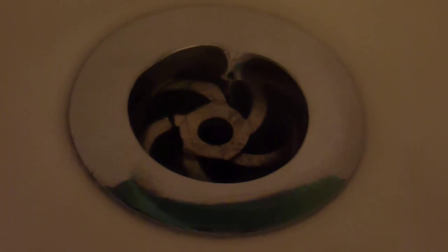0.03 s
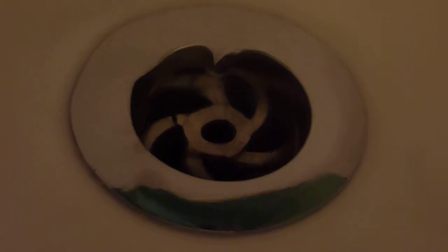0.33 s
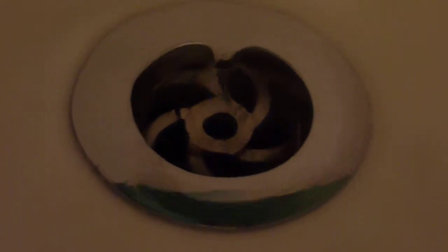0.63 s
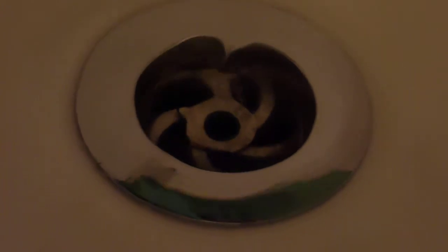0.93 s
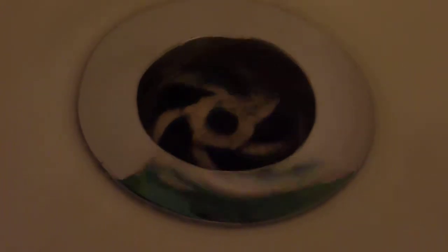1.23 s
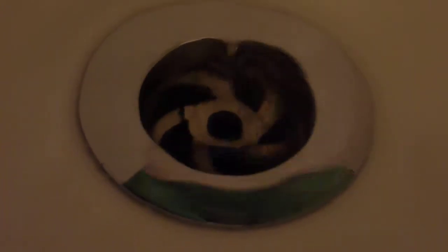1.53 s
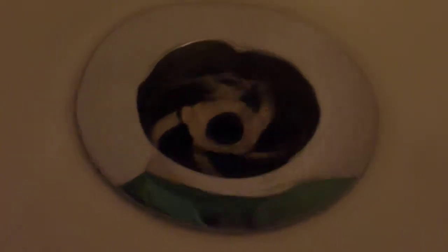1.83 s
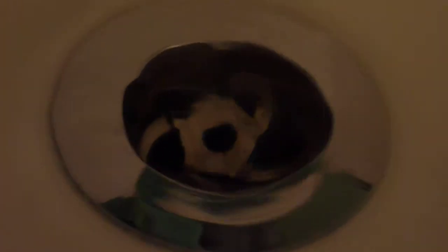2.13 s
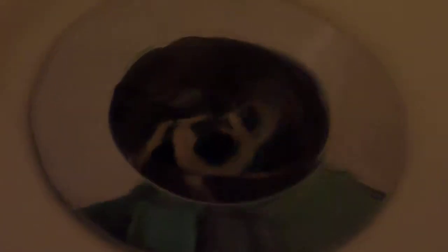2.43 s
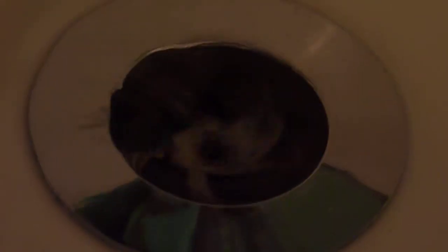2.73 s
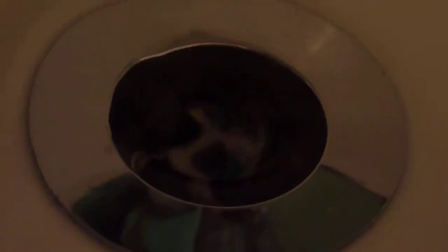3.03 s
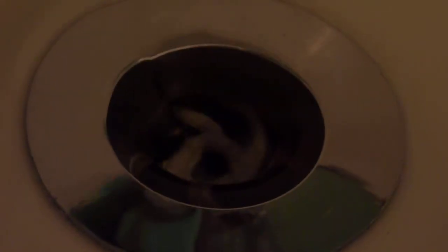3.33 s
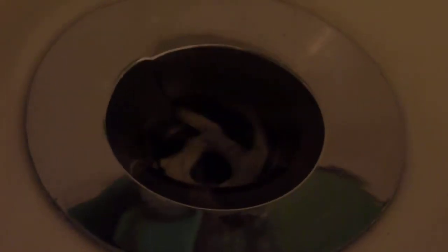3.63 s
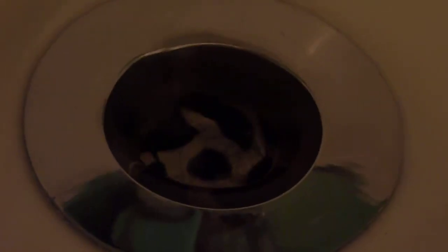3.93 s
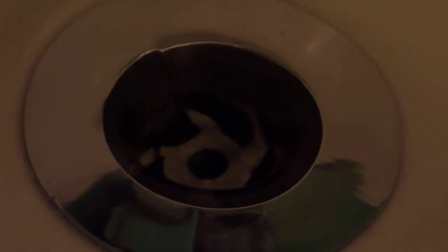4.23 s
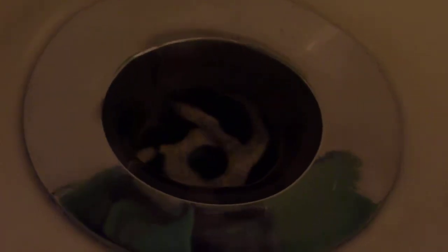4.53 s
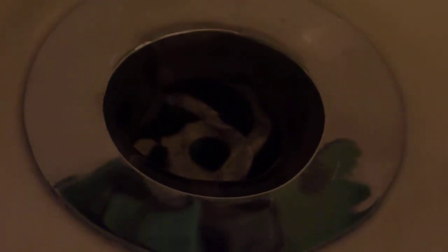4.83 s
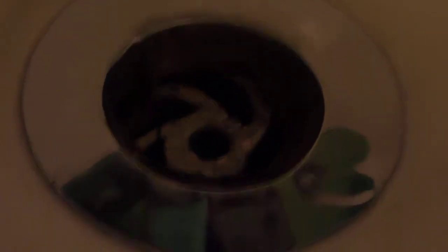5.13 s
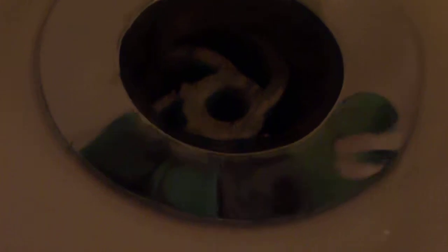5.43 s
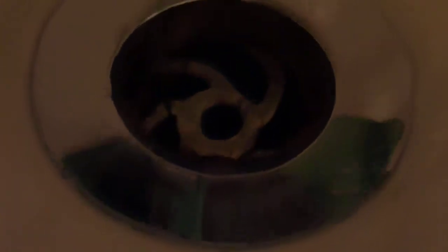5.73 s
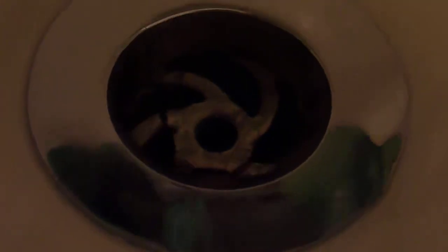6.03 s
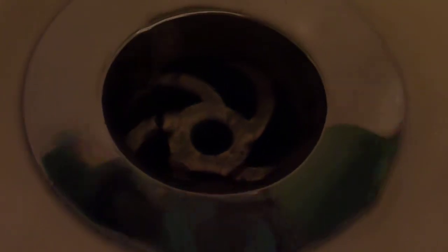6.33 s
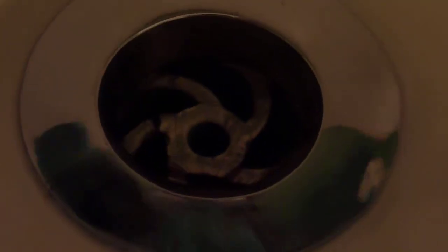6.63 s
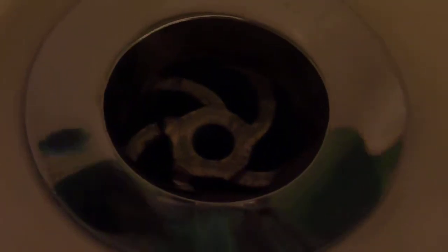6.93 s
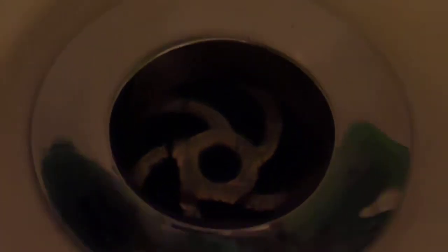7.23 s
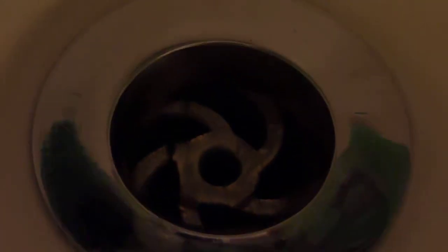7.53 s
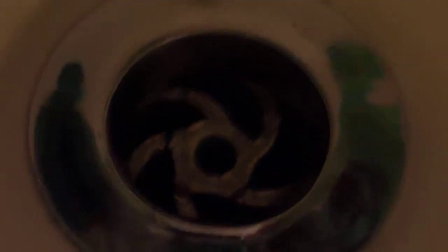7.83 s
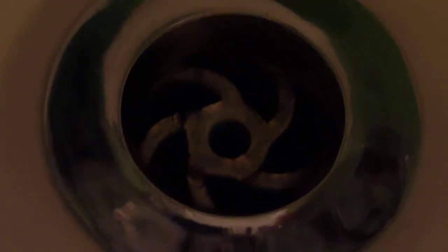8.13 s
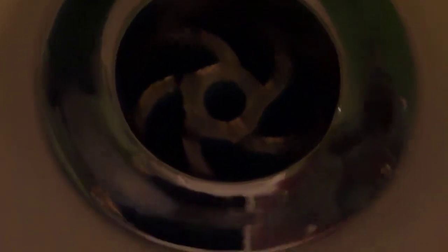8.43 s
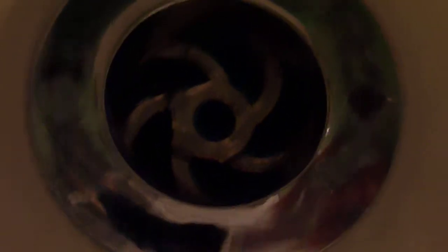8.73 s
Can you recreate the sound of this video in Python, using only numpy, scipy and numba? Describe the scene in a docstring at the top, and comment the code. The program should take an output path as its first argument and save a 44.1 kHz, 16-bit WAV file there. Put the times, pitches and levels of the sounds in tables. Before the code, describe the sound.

The last water gurgles down a sink drain close by, with big glugs and wet slurps fading into a soft trickle.

```python
"""A basin draining

The last water leaves a basin through its plughole, heard from close by in a small tiled room.
A swirling film spatters down the open waste pipe and excites its resonances. The throat chokes and
gulps air in big glugs, each a pocket of air ringing as it pinches off, and these end in wet slurps.
A thin trickle with small bursting bubbles runs on into the trap, whose hollow note rises as it fills."""
import sys
import numpy as np
from scipy import signal
from scipy.fft import rfft, irfft, next_fast_len
from scipy.io import wavfile
from numba import njit

SR = 44100
rng = np.random.default_rng(int(sys.argv[2]) if len(sys.argv) > 2 else 0)


def wav_out(sig):
    """Save sig, one row per channel (or a flat mono array), as 16-bit PCM at SR to the path in sys.argv[1]."""
    wavfile.write(sys.argv[1], SR, np.round(np.clip(np.atleast_2d(sig).T, -1, 1) * 32767).astype(np.int16))


N = 387638
TIME = np.arange(N) / SR
FFT_SIZE = next_fast_len(N + SR)
FREQ = np.maximum(np.arange(FFT_SIZE // 2 + 1) * SR / FFT_SIZE, 1)
# The film pours over the rim, the throat chokes, air slurps through, the basin is empty, the trap fills.
POUR_S, CHOKE_S, SLURP_S, EMPTY_S, FILL_S = 0.88, 3.315, 4.68, 5.28, 6.05

# Spectrum of the indoor background. Each row: frequency in Hz, relative level in dB.
ROOM_SPECTRUM = [(30, -31.5), (105, 1), (135, -9.5), (180, -2.5), (320, -7.5), (550, -12), (1200, -16.5),
                 (2200, -25), (6000, -29), (8000, -40.5)]
# Strength of the vortex. Each row: time in seconds, level in dB.
VORTEX_LEVEL = [(0.0, -53), (0.9, -53), (1.3, -42.5), (1.71, -45), (2.45, -30.5), (2.99, -35.5),
                (3.23, -31), (4.23, -24), (4.41, -33), (4.75, -23), (5.07, -26), (5.3, -37), (5.6, -43),
                (5.93, -39), (6.1, -55.5), (8.79, -55)]
# Resonance of the air pockets in the throat. Each row: time in seconds, pitch in Hz.
POCKET_PITCH = [(0.6, 206.5), (1.2, 323), (2.0, 300), (2.4, 175.2), (4.5, 350), (4.9, 239), (5.5, 378),
                (5.97, 335), (6.03, 183.4)]
# Low modes of basin and room. Each row: frequency in Hz, bandwidth in Hz, gain in dB.
LOW_MODES = [(72, 19, -3), (104.7, 8.4, 2.5), (142.3, 3.2, 3), (225.4, 1.7, -3), (337.4, 44, -5)]
# Gulps of air. Each row: start in seconds, level in dB, pitch in Hz, level of the splash in dB.
GULPS = [(0.059, -38, 512, -60), (1.45, -32.5, 324, -28.5), (1.859, -25.5, 317, -34),
         (2.044, -23, 310, -32), (2.323, -18, 155, -29.5), (2.414, -19.5, 345, -25),
         (2.678, -21.5, 147.5, -26.5), (3.062, -20.5, 317, -38), (3.106, -16, 254, -27),
         (3.25, -15.5, 200, -28), (3.315, -15.5, 202, -27), (3.391, -20, 342, -33), (3.461, -14, 302, -44),
         (3.52, -15, 462, -33.5), (3.625, -11.5, 371, -36), (3.673, -16.5, 185, -26.5),
         (3.74, -13.5, 186.6, -30), (3.782, -11.5, 343, -25.5), (3.806, -15.5, 297, -25),
         (3.89, -14.5, 410, -25.5), (3.95, -15.5, 416, -37), (3.973, -11, 344, -24.5),
         (3.99, -13.5, 361, -38), (4.015, -14.5, 395, -24), (4.071, -10, 383, -28), (4.088, -12, 309, -38),
         (4.126, -10, 421, -40), (4.137, -8, 315, -35.5), (4.163, -17, 347, -34.5), (4.189, -9, 328, -32.5),
         (4.26, -11.5, 281, -26.5), (4.298, -15, 382, -34), (4.322, -12.5, 318, -29),
         (4.347, -17, 330, -38), (4.398, -10, 338, -60), (4.443, -12.5, 308, -30), (4.551, -11.5, 334, -32),
         (4.596, -16.5, 392, -26), (4.659, -7, 415, -26.5), (4.692, -15.5, 342, -24),
         (4.725, -14.5, 427, -20), (4.75, -10.5, 369, -23), (4.806, -8.5, 233, -18.5),
         (4.913, -17, 212, -22), (4.993, -12, 201.3, -20), (5.023, -23.5, 202, -21.5),
         (5.086, -15.5, 390, -19.5), (5.148, -19, 386, -17.5), (5.219, -27, 366, -29),
         (5.519, -24.5, 371, -28)]
# Modes of the half-choked throat. Each row: frequency in Hz, bandwidth in Hz, relative gain in dB.
THROAT_MODES = [(426, 250, 39), (793.4, 260, 10), (1328, 320, -3), (2370, 430, -9.5)]
# Colouring of the froth deep in the pipe. Each row: frequency in Hz, relative gain in dB.
DEEP_FIZZ_COLOUR = [(2500, 5.5), (3200, -5), (4000, 2), (6000, -0.5)]
# Bubbles bursting at the grate. Each row: start in seconds, level in dB, pitch in Hz.
GRATE_BUBBLES = [(0.365, -39.5, 3100), (0.597, -34, 5240), (0.609, -30.5, 5640), (0.7275, -38, 6000),
                 (0.9298, -32.5, 6060), (1.0848, -27.5, 6170), (3.2963, -22, 6030), (3.4308, -31.5, 3370),
                 (3.6707, -19, 5270), (3.9269, -27.5, 3470), (3.9743, -21.5, 4290), (4.068, -25, 6650),
                 (4.136, -24, 3550), (4.3633, -33.5, 2600), (4.5823, -24, 6110), (4.6219, -26.5, 3070),
                 (4.665, -29.5, 2550), (4.97, -33, 2560), (4.995, -29, 2560), (5.0627, -27.5, 2490),
                 (5.162, -26.5, 2570), (5.2775, -27, 2600), (5.296, -25, 2470), (5.517, -30, 3080),
                 (6.0806, -31, 2830), (6.3453, -30.5, 2980), (6.66, -35.5, 3200), (8.2846, -33, 3940)]
# Gobs of water spattering down the pipe. Each row: start in seconds, level in dB.
GOBS = [(0.495, -43), (0.526, -41.5), (0.881, -38), (1.052, -37.5), (1.0767, -32), (1.119, -31.5),
        (1.1682, -32.5), (1.2162, -26.5), (1.2973, -33.5), (1.3759, -29), (1.4139, -30.5), (1.6044, -31.5),
        (1.6921, -27.5), (2.031, -28.5), (2.3246, -25.5), (2.4247, -30), (2.912, -35)]
# Modes of the open waste pipe. Each row: frequency in Hz, bandwidth in Hz, relative gain in dB.
PIPE_MODES = [(156, 8.8, 5.5), (599, 103, 14.5), (797, 61, 12.5), (1210, 165, 6), (1530, 94, 7),
              (1821, 63, 2), (2420, 71, 3), (2630, 77, -11.5), (3490, 150, -9), (4170, 110, -18),
              (5900, 900, -26)]
# Bubbles popping in the pipe. Each row: start in seconds, level in dB, pitch in Hz.
PIPE_BUBBLES = [(0.525, -38, 975), (2.677, -25, 1160), (3.141, -24.5, 1152), (3.3589, -24.5, 1230),
                (4.016, -25, 627), (4.693, -23, 842), (4.741, -17, 1474), (4.751, -19.5, 1180),
                (4.807, -31, 722), (4.914, -21.5, 832), (4.997, -18, 1288), (5.026, -21.5, 774),
                (5.085, -24, 1610), (5.151, -17.5, 810), (5.22, -24.5, 1510), (5.455, -25.5, 1330),
                (6.661, -34.5, 957)]
# Sharp wet smacks and ticks, from drops and the onsets of slurps.
# Each row: start in seconds, level in dB, pitch in Hz, spray level in dB.
WET_SMACKS = [(0.7839, -22.5, 2140, -34), (2.112, -28, 6000, -28), (2.358, -39, 3870, -35.5),
              (2.747, -30.5, 3500, -32), (4.999, -21, 1004, -56), (5.087, -15.5, 1920, -36.5),
              (5.347, -20.5, 3730, -55), (6.15, -20, 2850, -38), (6.2628, -46, 5000, -26),
              (7.446, -57, 4500, -42), (7.989, -39, 1700, -54)]
# Colouring of the froth at the grate. Each row: frequency in Hz, relative gain in dB.
GRATE_FIZZ_COLOUR = [(1000, 13.5), (2000, -1), (3600, 8), (4500, 1), (5200, 3), (6300, -0.5), (8500, 4.5)]
# Modes of the air column under the grate. Each row: frequency in Hz, bandwidth in Hz, gain in dB.
COLUMN_MODES = [(242, 8, -1), (810, 32, 4.5)]
# Strength of the trap's hollow note. Each row: time in seconds, level in dB.
TRAP_LEVEL = [(5.9, -54), (6.28, -46.5), (6.45, -56), (6.72, -44), (6.85, -54), (6.97, -51), (7.58, -61),
              (7.95, -56), (8.79, -60)]
# Balance of the two microphone ports. Each row: frequency in Hz, left minus right in dB.
PORT_LEVEL_GAP = [(250, 3), (600, 2), (1500, 2), (2800, -1), (6000, 0)]
# Phase between the ports. Each row: frequency in Hz, lead of the left in radians.
PORT_PHASE_LEAD = [(400, 0.089), (700, 0.8), (1300, 1.06), (3000, 1.71), (6000, 0.68)]


def undb(db):
    """Amplitude ratio of a level in decibels."""
    return 10 ** (np.asarray(db) / 20)


def unit(x):
    """Normalisation to an rms of 1."""
    return x / np.sqrt(np.mean(x ** 2))


def curve(rows, t):
    """Linear interpolation of (time, value) rows at times t."""
    return np.interp(t, *np.transpose(rows))


def across(points):
    """Interpolation of (frequency, value) rows on a logarithmic frequency axis."""
    hz, value = np.transpose(points)
    return np.interp(np.log(FREQ), np.log(hz), value)


def during(start_s, end_s, fade_s):
    """A gate: 1 while a stage lasts, fading linearly beyond its ends."""
    return np.clip(1 + np.minimum(TIME - start_s, end_s - TIME) / fade_s, 0, 1)


def since(s):
    """Seconds elapsed since a moment; 0 before it."""
    return np.maximum(TIME - s, 0)


def filtered(x, response):
    """Linear filtering: the spectrum is multiplied by a frequency response."""
    return irfft(rfft(x, FFT_SIZE) * response, FFT_SIZE)[..., :N]


def resonances(modes):
    """Superposition of the frequency responses of damped modes."""
    return sum(undb(db) / (1 + 1j * (FREQ ** 2 - hz ** 2) / (FREQ * width)) for hz, width, db in modes)


def unit_power(response):
    """Normalisation of a response so that white noise keeps its rms."""
    return response / np.sqrt(np.mean(np.abs(response) ** 2))


@njit
def ring_down(starts, hz, cycles, sizes, rise):
    """Damped oscillators: each swells over a cycle or two, then decays as its pitch rises."""
    out = np.zeros(N)
    for k in range(len(starts)):
        first, life, phase = int(starts[k] * SR), cycles[k] * SR / hz[k], 0.
        for i in range(min(int(6 * life), N - first)):
            phase += hz[k] / SR * (1 + rise * (1 - np.exp(-i / life / 2)))
            envelope = (1 - np.exp(-phase * phase / 2)) * np.exp(-i / life)
            out[first + i] += sizes[k] * envelope * np.sin(2 * np.pi * phase)
    return out


def bubbles(starts, hz, sizes, cycles, rise):
    """Bubble resonance: decay by 1/e in `cycles` periods, with pitch rising by the fraction `rise`."""
    return ring_down(starts, hz, np.full(len(starts), cycles, float), sizes, rise)


@njit
def cavity(x, hz, width_hz):
    """A band-pass resonance of constant bandwidth and moving centre."""
    y, band, low = np.empty(N), 0., 0.
    for i in range(N):
        tuning, damping = np.tan(np.pi * hz[i] / SR), width_hz / hz[i]
        velocity = (band + tuning * (x[i] - low)) / (1 + tuning * (tuning + damping))
        band, low = 2 * velocity - band, low + 2 * tuning * velocity
        y[i] = damping * velocity
    return y


def swarm(count, spread_db):
    """A random bubble population: start times, amplitudes, and spreads (-1 to 1) of pitch and ring."""
    slot, size, pitch, ring = rng.random((count, 4)).T
    size_db = spread_db * np.minimum(-np.log(1 - size), np.pi)
    return (np.arange(count) + slot) * N / SR / count, undb(size_db), 2 * pitch - 1, 2 * ring - 1


def spurts(per_s, depth_db):
    """Log-normal modulation by water that arrives in uneven spurts."""
    steps = rng.standard_normal(N // 100)
    return unit(undb(depth_db * np.interp(TIME * per_s, np.arange(len(steps)), steps)))


def patter(per_s, spread_db):
    """Shot noise: dense, tiny impacts of uneven size."""
    hits = (rng.random(N) < per_s / SR) * np.sign(rng.standard_normal(N))
    return unit(hits * undb(spread_db * np.minimum(rng.exponential(size=N), 4)))


def bursts(starts, levels_db, decay_s):
    """Tearing water skins throw spray: noise bursts with exponential decay."""
    out, t = np.zeros(N), TIME[:SR // 8]
    for start, db in zip(starts, levels_db):
        first = int(start * SR)
        burst = undb(db) * rng.standard_normal(len(t)) * np.exp(-t / decay_s)
        out[first:first + len(t)] += burst[:N - first]
    return out


def room_tone(level_db=-47.5):
    """Steady background noise, most coherent between the ports at long wavelengths."""
    mid, side = filtered(rng.standard_normal((2, N)), undb(across(ROOM_SPECTRUM)))
    side = filtered(side, undb(across([(150, -7.0), (1000, 8.5), (4000, 7.0)])))
    return unit(np.array([mid + side, mid - side])) * undb(level_db)


def churn():
    """Lesser air pockets tumble in the vortex and drive the cavity resonance of the throat."""
    s, size, pitch, ring = swarm(count=1200, spread_db=0.5)
    # Most are near the throat's size; the rest are any size that fits the pipe.
    hz = np.where(np.abs(ring) < .7, curve(POCKET_PITCH, s) * 2 ** (.5 * pitch), 290 * 2 ** (1.05 * pitch))
    pockets = unit(bubbles(s, hz, size, cycles=1.76 * 2 ** (.5 * ring), rise=0.04))
    hum_hz = curve(POCKET_PITCH, TIME) * spurts(per_s=25, depth_db=.45)
    hum = unit(cavity(pockets, hum_hz, width_hz=30.) * spurts(per_s=24, depth_db=4))
    rush = during(POUR_S, EMPTY_S, fade_s=0.21)  # rushing water damps the hum and tumbles more air
    mix = pipe_echo(pockets) * undb(-5.5 + 5.6 * rush) + hum * undb(-0.5 - 30 * rush)
    level_db = curve(VORTEX_LEVEL, TIME)
    # At full flow the air goes down in whole gulps instead, with lulls between the slurps.
    choke_db = 0.15 * np.maximum(level_db + 36, 0) + 7 * during(SLURP_S, EMPTY_S - .1, fade_s=0.1)
    drained_db = 6.9 * np.minimum(since(FILL_S - .1) / 0.49, 1)  # the last thread traps little air
    # The churning swells with the last slurp and stops short.
    swell_db = np.interp(TIME, [5.10, 5.21, 5.25], [0, 9, 0])
    return mix * undb(level_db + swell_db - choke_db - drained_db + 0.7)


def pipe_echo(x):
    """Reflection: low notes run down the waste pipe and return inverted from its far end."""
    round_trip = np.exp(-2j * np.pi * FREQ / 71.5)  # a delay of 14 ms
    return filtered(x, 1 - undb(-9.5) * round_trip / (1 + 1j * FREQ / 900))


def rumble():
    """Forced vibration: the vortex buffets the low modes, more as flow grows, fading with the slurps."""
    bass = undb(across([(30, -27.0), (55, -5.5), (135, 0.5), (200, -0.5), (400, -49.5)]))
    buffet = unit(filtered(rng.standard_normal(N), bass * (.5 + resonances(LOW_MODES))))
    level_db = 0.77 * np.minimum(curve(VORTEX_LEVEL, TIME) + 33, 0) - 40.5
    return buffet * undb(level_db) * during(0, SLURP_S, fade_s=0.69)


def glugs(trail_decay_s=0.022):
    """Big air pockets pulsate as they pinch off; the tearing skin splashes and sheds small bubbles."""
    s, db, hz, splash_db = np.array(GULPS, float).T.copy()
    pockets = bubbles(s - 0.22 / hz, hz, undb(db + 9.5), cycles=1.8, rise=0.05)
    throat_hz = np.array(THROAT_MODES)[:, 0]
    trail = 0
    for centre_hz in throat_hz:  # bubbles near the throat's resonances are the ones that carry
        size = undb(splash_db + 1.5 - 9.7 * np.abs(np.log2(centre_hz / throat_hz[1])))
        for turn in range(5):
            late, pitch = rng.random((len(s), 2)).T
            after_s = .002 + .014 * turn + .009 * late
            shed_hz = centre_hz * 2 ** (.8 * (pitch - .4))
            shed_size = size * np.exp(-after_s / trail_decay_s)
            trail += bubbles(s + after_s, shed_hz, shed_size, cycles=5, rise=0.02)
    splash = bursts(s + 0.001997, splash_db, decay_s=0.0067)
    throat = unit_power(resonances(THROAT_MODES) / (1 + 1j * FREQ / 4200) ** 2)
    return pockets + trail + filtered(splash, throat)


def deep_fizz(fullest_s=1.01, build_db_per_s=41, fall_db_per_s=4):
    """Tiny bubbles resonate at high pitch down the open pipe until the throat closes over them."""
    s, size, pitch, ring = swarm(count=5000, spread_db=3.6)
    pings = unit(bubbles(s, 4500 * 2 ** (.8 * pitch), size, cycles=9 * 2 ** ring, rise=0.02))
    pings = unit(filtered(pings * spurts(per_s=40, depth_db=4), undb(across(DEEP_FIZZ_COLOUR))))
    level_db = -48.5 - build_db_per_s * np.maximum(fullest_s - TIME, 0) - fall_db_per_s * since(fullest_s)
    return pings * undb(level_db) * during(0, CHOKE_S, fade_s=0.23)


def plinks():
    """Bubbles bursting at the grate resonate in a short rising chirp, each shedding two lesser ones."""
    s, db, hz = np.array(GRATE_BUBBLES, float).T.copy()
    out = bubbles(s, hz, undb(db + 2), cycles=12, rise=0.025)
    for _ in range(2):
        late, pitch = rng.random((len(s), 2)).T
        out += bubbles(s + 0.0051 * late, hz * 2 ** (1.1 * (pitch - .5)), undb(db), cycles=4, rise=0.019)
    return out


def splats():
    """Impact excitation: gobs hit the wall, ring the pipe's upper modes and trap two bubbles each."""
    s, db = np.array(GOBS, float).T.copy()
    spatter = bursts(s, db, decay_s=0.0043)
    trapped = 0
    for centre_hz in (1400, 2400):
        late, pitch = rng.random((len(s), 2)).T
        hz = centre_hz * 2 ** (.35 * (pitch - .5))
        trapped += bubbles(s + .003 * late, hz, undb(db + 2), cycles=10, rise=0.012)
    wet_contact = 1 / ((1 + 1800 / (1j * FREQ)) * (1 + 1j * FREQ / 1800)) ** 3
    return trapped + filtered(spatter, unit_power(resonances(PIPE_MODES) * wet_contact))


def pops():
    """Middling bubbles break in the pipe, each ringing briefly at its natural frequency."""
    s, db, hz = np.array(PIPE_BUBBLES, float).T.copy()
    return bubbles(s, hz, undb(db + 0.5), cycles=10, rise=0.0069)


def smacks():
    """Heavily damped transients: a drop or the onset of a slurp gives a smack, a lower snap and spray."""
    s, db, hz, spray_db = np.array(WET_SMACKS, float).T.copy()
    smack = bubbles(s, hz, undb(db + 14.5), cycles=1, rise=0.02)
    snap = bubbles(s + 0.0028, hz * 0.76, undb(db + 12.5), cycles=1, rise=0.02)
    spray = bursts(s, spray_db, decay_s=0.0036)
    return smack + snap + filtered(spray, unit_power(resonances([(3900, 8000, 0)])))


def film(level_db=-40.5, smother_db=6, thin_hz=2038, thick_hz=1450):
    """Air entrainment: the falling film crackles and traps bubbles that excite the pipe's modes."""
    s, size, pitch, ring = swarm(count=1800, spread_db=4.2)
    # The bubbles grow, and so fall in pitch, as the film thickens.
    hz = np.interp(s, [POUR_S, CHOKE_S], [thin_hz, thick_hz]) * 2 ** (.6 * pitch)
    babble = unit(bubbles(s, hz, size, cycles=7 * 2 ** (.5 * ring), rise=0.017))
    age_s = since(POUR_S)
    choked = during(CHOKE_S + 0.34, EMPTY_S, fade_s=0.18)
    flow = undb(level_db - smother_db * choked) * during(POUR_S, EMPTY_S, fade_s=0.0076)
    flow *= spurts(per_s=38, depth_db=2.0)
    flow *= 1 - 0.42 * np.exp(-age_s / 0.035)  # the film takes a moment to thicken
    impacts = (undb(-2) * patter(per_s=900, spread_db=2.2) + undb(-9) * babble) * flow
    rung = filtered(impacts, unit_power(resonances(PIPE_MODES) / (1 + 1j * FREQ / 4200) ** 2))
    lows = filtered(rung, 1 / (1 + (FREQ / 1050) ** 6))
    rung -= 0.81 * lows * np.exp(-age_s / 0.5)  # a thin film is too light to stir the low modes
    return rung + undb(-4 - 3.5 * age_s) * babble * flow


def grate_fizz(hold_s=2.62, fall_db_per_s=13):
    """Froth backs up from the choked throat and bursts: clusters of bubble resonances over shot noise."""
    s, size, pitch, ring = swarm(count=5600, spread_db=4.8)
    pings = unit(bubbles(s, 3900 * 2 ** (.95 * pitch), size, cycles=4.5 * 2 ** (1.6 * ring), rise=0.02))
    crackle = undb(-5) * patter(per_s=1000, spread_db=4.4)
    clusters = (pings + crackle) * spurts(per_s=30, depth_db=3.0)
    fizz = unit(filtered(clusters, undb(across(GRATE_FIZZ_COLOUR))))
    froth = undb(-44 - fall_db_per_s * since(CHOKE_S + hold_s)) + undb(-61)  # dies to a faint remainder
    froth *= undb(-3.5 * during(EMPTY_S + 0.11, FILL_S - .2, fade_s=0.48))  # the last swirl covers it
    backed_up = np.minimum(since(CHOKE_S - .2) / 0.47, 1)
    spray = undb(-39) * np.exp(-((TIME - 4.06) / 0.07) ** 2)  # flung as the vortex closes
    return fizz * (backed_up * froth + spray)


def air_column(gulps):
    """Column resonance: once air breaks through, each gulp leaves the air under the grate ringing."""
    slurps = gulps * during(SLURP_S + 0.12, EMPTY_S, fade_s=0.05)
    return gulps + filtered(slurps, resonances(COLUMN_MODES))


def trap_hz(t, low_hz=764, full_hz=1032, time_constant_s=0.69):
    """The natural frequency of the air above the trap rises as its volume shrinks."""
    return full_hz - (full_hz - low_hz) * np.exp(-np.maximum(t - FILL_S, 0) / time_constant_s)


def trickle(settle_db_per_s=7.5):
    """The last thread of water drives the cavity resonance above the trap and stirs small bubbles."""
    s, size, pitch, ring = swarm(count=2600, spread_db=3.5)
    drops = bubbles(s, trap_hz(s) * 2 ** (.25 * pitch), size, cycles=3 * 2 ** ring, rise=0.05)
    note_hz = trap_hz(TIME) * spurts(per_s=28, depth_db=.35)  # the surface rocks
    note = unit(cavity(drops, note_hz, width_hz=70.) * spurts(per_s=16, depth_db=2.5))
    s, size, pitch, ring = swarm(count=5000, spread_db=3.2)
    stirred = unit(bubbles(s, 1400 * 2 ** pitch, size, cycles=2 * 2 ** ring, rise=0.013))
    settling = undb(-46 - settle_db_per_s * since(EMPTY_S))
    mix = note * undb(curve(TRAP_LEVEL, TIME)) + stirred * settling
    return mix * during(EMPTY_S, TIME[-1], fade_s=0.017)


def reflections(t60_s, wet_db, channels):
    """Reverberation: the response of dense echoes that start after 2 ms and decay exponentially."""
    t = TIME[:SR // 2]
    tail = rng.standard_normal((channels, len(t))) * np.exp(-np.log(1000) * t / t60_s) * (t > .002)
    return undb(wet_db) * unit_power(rfft(tail, FFT_SIZE))


def bowl_echoes(drain, positions=5):
    """Reflections off the bowl interfere in a changing pattern as the hand-held microphone drifts."""
    out, colour = 0, undb(across([(400, -3.5), (1200, -1.5)]))
    for position in np.eye(positions):
        crossfade = np.sqrt(np.interp(TIME, np.linspace(0, TIME[-1], positions), position))
        out += filtered(drain * crossfade, reflections(t60_s=0.3, wet_db=-4.5, channels=1) * colour)
    return out


def scene():
    """Superposition: the drain sounds through the basin to two ports, with the tiled room behind."""
    drain = air_column(pipe_echo(glugs())) + churn() + rumble() + film() + splats() + smacks() + pops()
    drain += deep_fizz() + grate_fizz() + plinks() + trickle()
    basin = (1 + resonances(LOW_MODES)) * undb(across([(35, -21.0), (80, -4.5), (900, 2.1)]))
    radiated = bowl_echoes(drain) + filtered(drain, basin)
    sides = np.array([[.5], [-.5]])
    ports = undb(sides * across(PORT_LEVEL_GAP)) * np.exp(1j * sides * across(PORT_PHASE_LEAD))
    room = reflections(t60_s=.3, wet_db=-13, channels=2) * undb(across([(300, -10), (2500, 0)]))
    return filtered(radiated, ports + room) + room_tone()


def record(dry, rolloff_hz=7150, top_hz=8900):
    """Band limiting: two low-pass filters roll the treble off and cut the top."""
    soft = signal.sosfilt(signal.butter(14, rolloff_hz, fs=SR, output="sos"), dry)
    return signal.sosfilt(signal.ellip(8, .2, 70, top_hz, fs=SR, output="sos"), soft)


dry = scene()
out = record(dry)
wav_out(out)
```